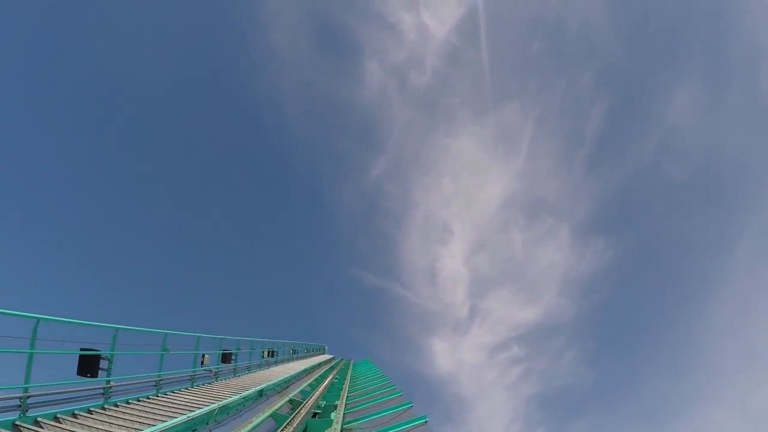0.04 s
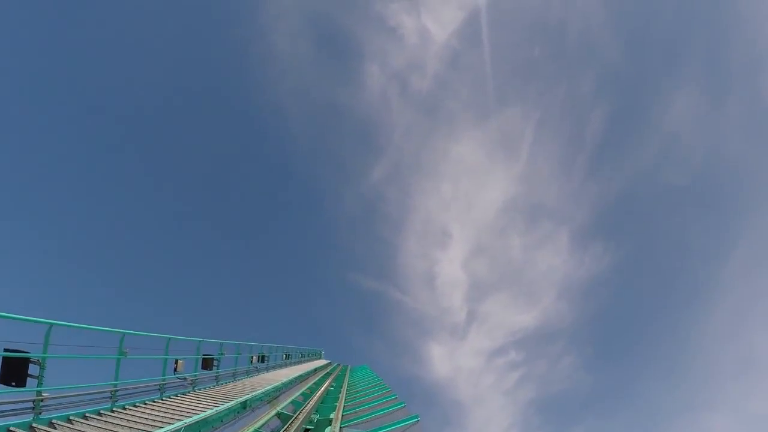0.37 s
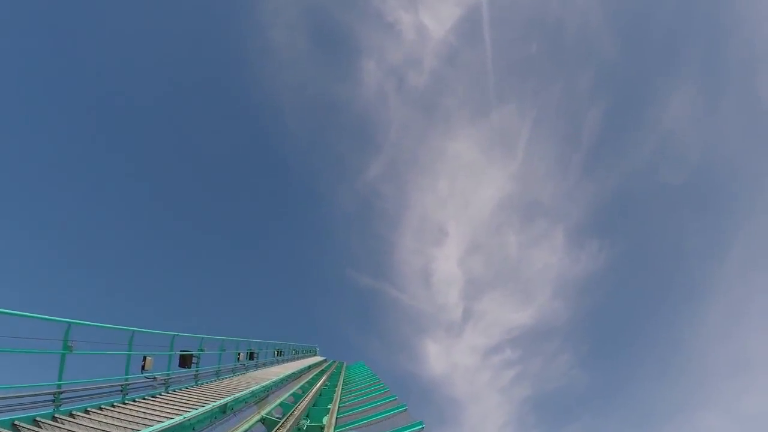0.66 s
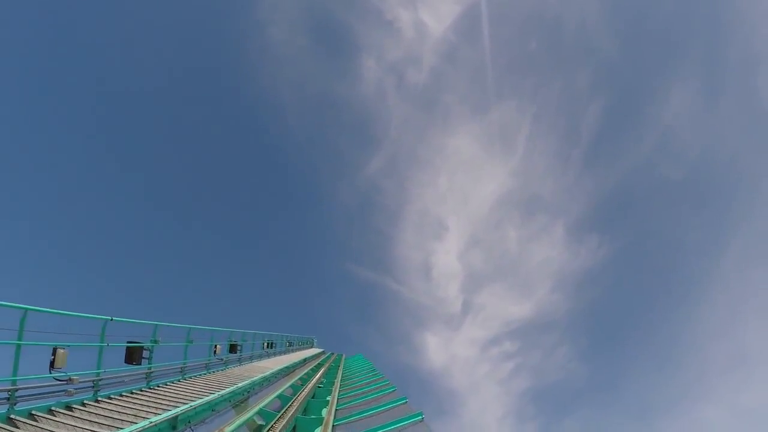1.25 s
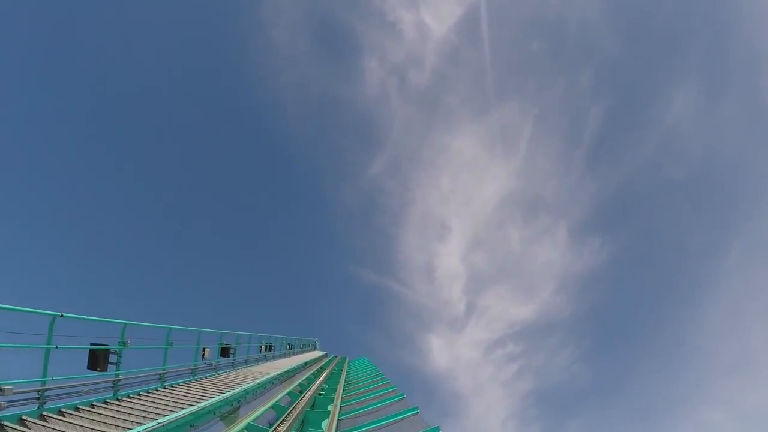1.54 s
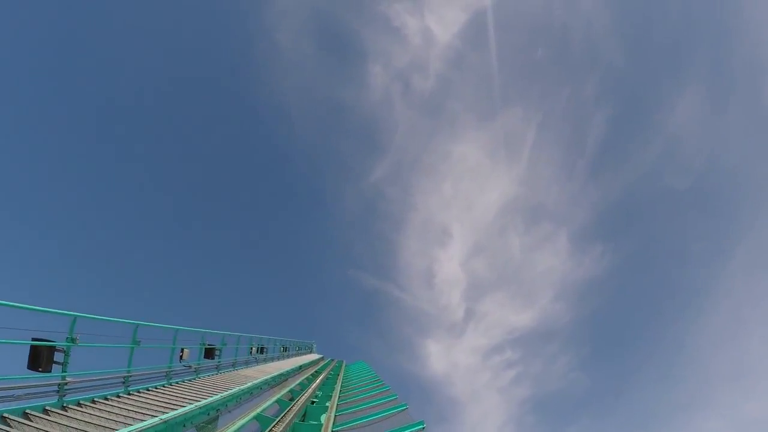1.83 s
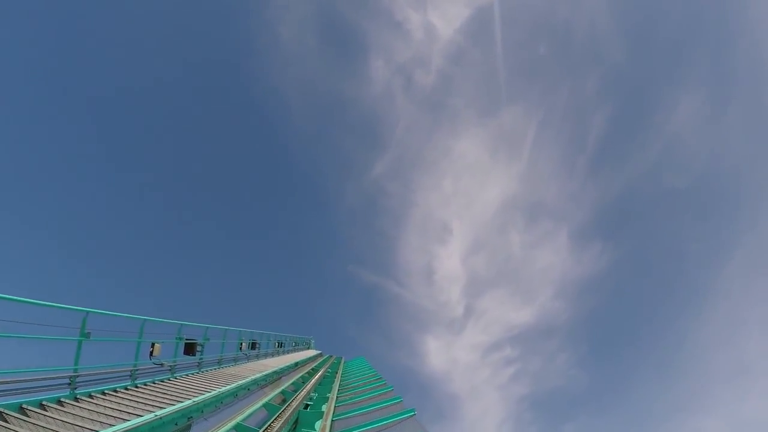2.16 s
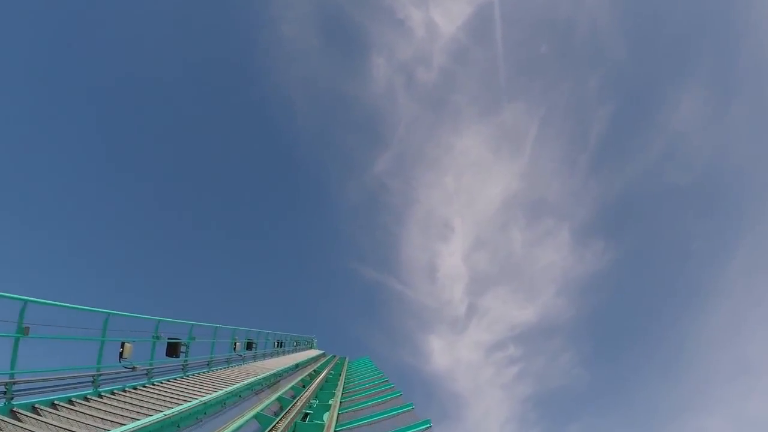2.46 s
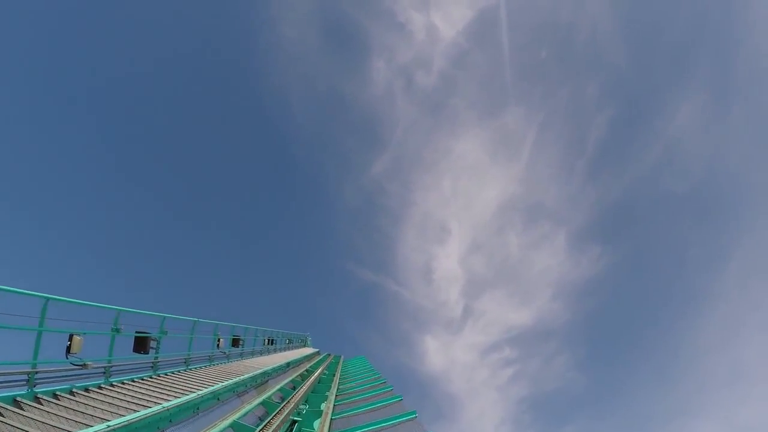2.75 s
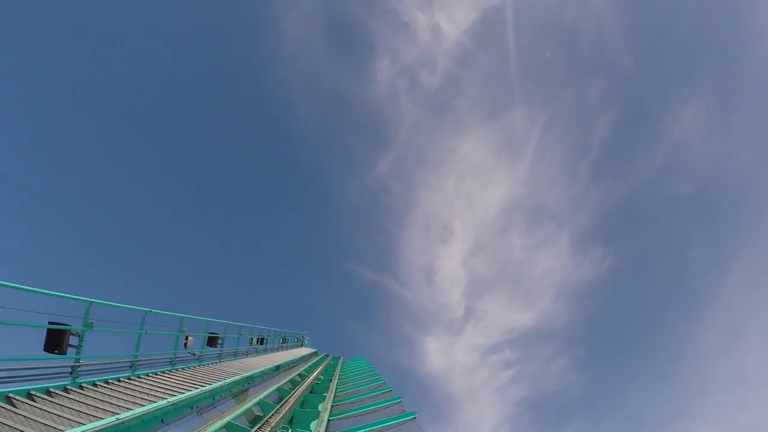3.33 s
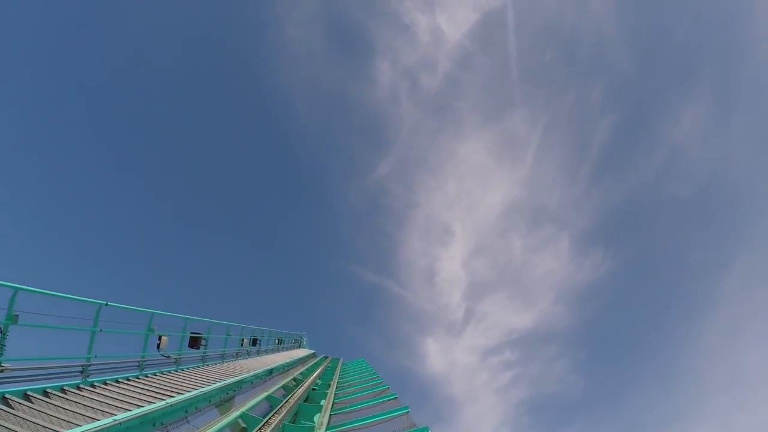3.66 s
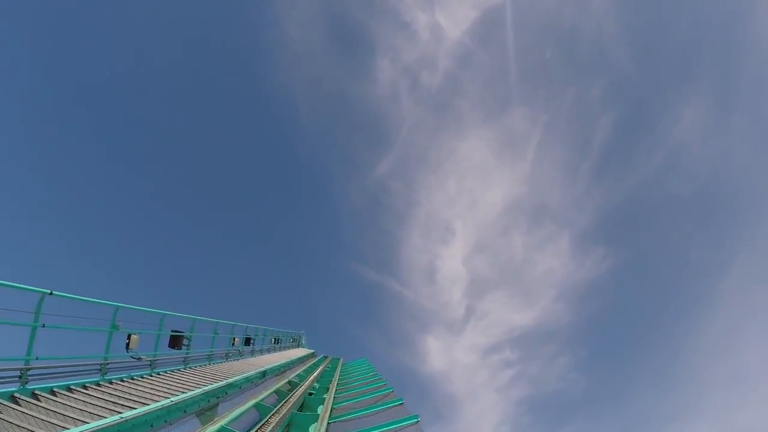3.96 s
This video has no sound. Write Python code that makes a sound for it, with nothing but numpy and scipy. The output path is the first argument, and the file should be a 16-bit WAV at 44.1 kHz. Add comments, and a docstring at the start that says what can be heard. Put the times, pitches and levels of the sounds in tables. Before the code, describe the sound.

Low rumble of a climbing roller coaster, with wind on the microphone and sharp steel clacks.

```python
"""A roller coaster train is hauled up its lift hill, heard from an open seat.
From the start wind flutters on the microphone, the car rumbles and drones, the lift chain rushes below.
From 0.4 s loose fittings rattle and knock and the track jolts the car; a hard clack comes at 0.7 s.
Light steel ticks follow, and two faint scrapes of the running gear at 2.5 and 2.9 s.
At 3.8 s steel snaps on steel and rings, then a double clunk."""
import sys
import numpy as np
from scipy import signal
from scipy.fft import rfft, irfft, next_fast_len
from scipy.io import wavfile
from scipy.ndimage import uniform_filter1d, map_coordinates

SR = 44100
rng = np.random.default_rng(int(sys.argv[2]) if len(sys.argv) > 2 else 0)


def put_to_file(sound):
    """Save the sound as 16-bit audio at rate SR, in the file named by the first command-line argument."""
    columns = np.atleast_2d(sound).T  # one column per channel
    safe = np.clip(columns, -1, 1)
    whole_steps = np.round(safe * 32767)
    wavfile.write(sys.argv[1], SR, whole_steps.astype(np.int16))


N = 176400

# Level curves, before layer gain: time_s, level_db
WIND_LEVEL = [(0, -15), (1, -17), (2.6, -16), (2.85, -11.5), (3.19, -24.5), (3.37, -14.5), (3.8, -18),
              (3.96, -13)]
RUMBLE_LEVEL = [(0, -18.5), (.9, -18), (1.25, -17), (1.95, -19.5), (2.24, -17), (2.55, -20), (2.9, -23),
                (3.16, -27.5), (3.27, -19), (4, -22)]
DRONE_LEVEL = [(0, -31), (.6, -26), (1.3, -28), (1.8, -33), (2.2, -28), (2.75, -29.5), (3.08, -41),
               (3.25, -32), (3.7, -29), (4, -29)]
CHAIN_LEVEL = [(0, -46.5), (.5, -45.5), (2.1, -47), (2.75, -49), (3.1, -51.5), (3.55, -49), (4, -45)]

# Source spectra: freq_hz, relative_db
WIND_SPECTRUM = [(8, -16), (18, -7), (25, 7.5), (33, 6), (45, -0.5), (70, -15), (200, -82.5)]
RUMBLE_SPECTRUM = [(30, -15), (50, -11.5), (68, -3), (85, 1), (108, -3.5), (130, -12.5), (160, -16),
                   (300, -32), (700, -85.5)]
DRONE_SPECTRUM = [(120, -33), (165, -10.5), (193, 2), (224, -1), (243, -8.5), (265, -7), (285, -14),
                  (360, -28), (500, -32.5), (1000, -83.5)]
CHAIN_SPECTRUM = [(400, 7), (700, 0.5), (1150, 1.5), (1550, -10), (1900, -3.5), (2550, -20.5),
                  (3800, -20.5), (7200, -30), (12500, -42), (16000, -62.5)]
RATTLE_SPECTRUM = [(250, 5.5), (1200, 6), (1900, 4), (2600, -10), (3400, -3.5), (4300, -19.5),
                   (5500, -13.5), (7200, -23.5), (8500, -31.5), (15000, -39.5)]
KNOCK_SPECTRUM = [(100, -2), (280, 12.5), (480, 5), (750, -0.5), (1200, 1.5), (1650, -17), (3500, -27.5),
                  (12000, -52.5)]
JOLT_SPECTRUM = [(15, -18.5), (30, -3.5), (85, 9.5), (115, 5), (160, -12), (210, -10), (300, -25),
                 (600, -79.5)]
CLACK_SPECTRUM = [(300, -4.5), (750, -1), (1250, 5), (1600, -1.5), (2200, 2), (2800, -13), (3700, -15.5),
                  (4500, -30.5), (6000, -28.5), (11000, -56)]
TICK_SPECTRUM = [(2000, -19), (3460, 2), (4230, -6.5), (4810, 1), (5600, -13.5), (7150, -10.5),
                 (16000, -35.5)]
SCRAPE_SPECTRUM = [(2000, -16.5), (5000, -0.5), (12000, -6), (16000, -13.5)]
SNAP_SPECTRUM = [(300, -17.5), (1300, -12), (2050, -5), (2900, 0), (3700, -1.5), (4200, -11), (4750, -5),
                 (5600, -14.5), (6700, -6.5), (8500, -15.5), (11500, -17), (12700, -29.5), (16000, -27.5)]

# Chain clatters: centre_s, level_db
CLATTERS = [(.205, -39.5), (.59, -48.5), (.9, -51.5), (1.143, -41.5), (1.375, -46), (1.61, -46),
            (3.52, -44)]
# Loose-metal rattles, before layer gain: centre_s, length_s, chatter_db, buzz_db
RATTLES = [(0.414, 0.013, -35.5, -40), (0.511, 0.0088, -43.5, -40.5), (.646, 0.0064, -49.5, -44.5),
           (0.965, 0.012, -45, -60), (1.759, 0.012, -37, -46.5), (1.841, 0.012, -41.5, -52),
           (1.882, 0.016, -32.5, -41), (1.917, 0.009, -40, -41), (2.0, 0.013, -40, -56),
           (2.098, 0.012, -50, -49), (2.161, 0.0074, -44, -50), (2.247, 0.022, -42.5, -54),
           (2.345, .008, -51, -46), (2.45, 0.0098, -35, -33.5), (2.485, 0.02, -43.5, -50),
           (2.839, 0.02, -43.5, -47), (2.955, 0.02, -34.5, -46), (3.029, .009, -54, -51),
           (3.225, 0.0092, -42.5, -48), (3.326, 0.0099, -41.5, -43.5), (3.419, 0.01, -43, -42),
           (3.693, .008, -43.5, -51), (3.9, 0.0035, -38, -28)]
# Fitting knocks and car jolts, before layer gain: start_s, level_db
KNOCKS = [(.512, -27.5), (.833, -30), (1.733, -25.5), (1.755, -29.5), (1.857, -27.5), (2.192, -29),
          (2.324, -29.5), (2.44, -28), (2.564, -22.5), (2.631, -31.5), (2.815, -30.5), (3.106, -31),
          (3.1405, -30), (3.219, -27.5), (3.277, -26.5), (3.32, -26.5), (3.417, -27.5), (3.696, -32.5),
          (3.811, -24.5), (3.898, -18.5), (3.911, -16)]
JOLTS = [(.566, -3), (.694, -4.5), (1.103, -7.5), (1.22, -3), (1.345, -7), (1.612, -11), (1.733, -5),
         (2.06, -6.5), (2.215, -4.5), (2.337, -8.5), (2.808, -10.5), (2.932, -4.5), (3.607, -7.5),
         (3.9, -7.5)]
# Clack contacts and steel ticks: start_s, level_db
CLACKS = [(.7063, -13.5), (.7075, -8.5), (.7104, -10), (.719, -28), (3.898, -20), (3.9112, -29)]
TICKS = [(1.068, -38), (2.788, -23), (3.48, -32.5)]
# Running-gear scrapes: centre_s, length_s, level_db
SCRAPES = [(2.493, 0.03, -63), (2.86, 0.04, -61.5)]
# Steel modes: pitch_hz
STEEL_HZ = [3074, 3354, 4183, 4312, 4500, 4834, 5394, 5464, 6105, 6778, 6982]
# Strength and decay of those modes: relative_db, t60_s
STEEL_DECAYS = [(-18.5, .3), (-14.5, .2), (-21.5, .35), (-10.5, 0.247), (-6, 0.2), (4.5, 0.1), (-5.5, 0.12),
                (-10.5, .27), (-23, 0.18), (-9, .1), (-18.5, 0.36)]


def amp(db):
    """Decibels to gain."""
    return 10 ** (np.asarray(db) / 20)


def unit(x):
    """Scale to rms 1."""
    return x / np.sqrt(np.mean(x ** 2) + 1e-20)


def curve(rows):
    """Per-sample values from (time_s, value) rows."""
    return np.interp(np.arange(N) / SR, *np.transpose(rows))


def wobble(rate_hz):
    """Smooth random curve with knots at rate_hz."""
    return map_coordinates(rng.standard_normal(4000), [np.arange(N) * rate_hz / SR], mode="wrap")


def swell(centre_s, length_s):
    """Smooth rise and fall, peak 1."""
    return 1 / np.cosh(np.clip(2.8 * (np.arange(N) / SR - centre_s) / length_s, -20, 20))


def colour(x, spectrum):
    """Minimum-phase filter; keeps the power of white noise."""
    size = 2 * next_fast_len(len(x) // 2 + 8192)
    hz, db = np.transpose(spectrum)
    bins_hz = np.fft.rfftfreq(size, 1 / SR)
    gain = unit(amp(np.interp(np.log(bins_hz + 1), np.log(hz), db)))
    cepstrum = irfft(np.log(gain))
    cepstrum[1:size // 2] *= 2
    cepstrum[size // 2 + 1:] = 0
    return irfft(rfft(x, size) * np.exp(rfft(cepstrum)))[:len(x)]


def noise(spectrum):
    """Coloured noise, rms 1."""
    return unit(colour(rng.standard_normal(N + SR // 2), spectrum)[-N:])


def even(x, span_s):
    """Even out swells longer than span_s; rms 1."""
    window = signal.windows.hann(int(span_s * SR) + 3)
    power = np.abs(signal.fftconvolve(x ** 2, window / window.sum(), "same"))
    return unit(x / np.sqrt(power + 0.099))


def add(track, start_s, sound):
    """Mix a sound into the track."""
    part = track[round(start_s * SR):][:len(sound)]
    part += sound[:len(part)]


def blows(rows, spectrum, t60_s, scatter):
    """Impacts: a push plus scattered reflections that ripple the spectrum but keep its broad shape."""
    track, t, lead_samples = np.zeros(N), np.arange(SR // 5) / SR, 128
    impulse_peak = np.abs(colour(1. * (t == 0), spectrum)).max()
    for start_s, db in rows:
        force = rng.standard_normal(len(t)) * amp(-60 * t / t60_s)
        force *= scatter / np.linalg.norm(force)
        force[0] += 1
        ripple = rfft(np.roll(force, lead_samples))
        broad_power = uniform_filter1d(uniform_filter1d(np.abs(ripple) ** 2, size=140), size=140)
        blow = colour(irfft(ripple / np.sqrt(broad_power)), spectrum)
        add(track, start_s - lead_samples / SR, amp(db) * blow / impulse_peak)
    return track


def wind():
    """Air flutters on the microphone."""
    return amp(curve(WIND_LEVEL)) * even(noise(WIND_SPECTRUM), span_s=.19)


def car_rumble(links_db, gain_db=-1):
    """The car rumbles on the track."""
    return amp(curve(RUMBLE_LEVEL) + gain_db + links_db) * even(noise(RUMBLE_SPECTRUM), span_s=.12)


def shell_drone(links_db, gain_db=-.5, depth_db=2.5, crest_s=.53, period_s=.5375):
    """The car's shell drones in regular surges."""
    surge_db = depth_db * np.cos(2 * np.pi * (np.arange(N) / SR - crest_s) / period_s)
    level_db = curve(DRONE_LEVEL) + gain_db + surge_db + links_db
    return amp(level_db) * even(noise(DRONE_SPECTRUM), span_s=.16)


def chain_rush(links_db, gain_db=1):
    """The lift chain rushes, clattering now and then."""
    rush = amp(curve(CHAIN_LEVEL) + gain_db + links_db / 2 + wobble(rate_hz=41))
    clatter = sum(amp(db) * swell(centre_s, length_s=.019) for centre_s, db in CLATTERS)
    return (rush + clatter) * noise(CHAIN_SPECTRUM)


def chain_rollers(gain_db=-13.5, ticks_per_s=35):
    """The rollers tick dryly at random."""
    impulses = rng.standard_normal(N) * (rng.random(N) < ticks_per_s / SR)
    return amp(curve(CHAIN_LEVEL) + gain_db) * unit(colour(impulses, RATTLE_SPECTRUM))


def rattles(chatter_gain_db=-.5, buzz_gain_db=-9.5, buzz_hz=3430, half_width_hz=170):
    """Loose metal: flurries of tiny contacts and a narrow buzzing resonance."""
    chatter_env = sum(amp(db) * swell(centre_s, length_s) for centre_s, length_s, db, _ in RATTLES)
    buzz_env = sum(amp(db) * swell(centre_s, length_s) for centre_s, length_s, _, db in RATTLES)
    contacts = rng.standard_normal(N) * amp(2.1 * wobble(rate_hz=250) + 4.3 * rng.standard_normal(N))
    chatter = unit(colour(contacts, RATTLE_SPECTRUM))
    resonance = 1 / (1 + ((np.fft.rfftfreq(N, 1 / SR) - buzz_hz) / half_width_hz) ** 2)
    buzz = even(irfft(rfft(rng.standard_normal(N)) * resonance, N), span_s=.02)
    return amp(chatter_gain_db) * chatter_env * chatter + amp(buzz_gain_db) * buzz_env * buzz


def knocks(gain_db=4):
    """Loose fittings knock dully."""
    return amp(gain_db) * blows(KNOCKS, KNOCK_SPECTRUM, t60_s=.02, scatter=.75)


def jolts(gain_db=.5):
    """The track jolts the car with low thuds."""
    return amp(gain_db) * blows(JOLTS, JOLT_SPECTRUM, t60_s=.051, scatter=.5)


def clacks():
    """Hard contacts, milliseconds apart, stutter into clacks."""
    return blows(CLACKS, CLACK_SPECTRUM, t60_s=.014, scatter=1.6)


def steel_modes(t):
    """Struck steel: one decaying sine per mode."""
    return [amp(db - 60 * t / t60_s) * np.sin(2 * np.pi * hz * t)
            for hz, (db, t60_s) in zip(STEEL_HZ, STEEL_DECAYS)]


def steel_ticks(ring_gain_db=-34):
    """Light taps stir only the steel's strongest mode."""
    ring = max(steel_modes(np.arange(SR // 2) / SR), key=np.max)
    track = blows(TICKS, TICK_SPECTRUM, t60_s=.008, scatter=1)
    for start_s, db in TICKS:
        add(track, start_s, amp(db + ring_gain_db) * ring)
    return track


def gear_scrapes():
    """The running gear scrapes, thin and high."""
    envelope = sum(amp(db) * swell(centre_s, length_s) for centre_s, length_s, db in SCRAPES)
    return envelope * noise(SCRAPE_SPECTRUM)


def steel_snap(start_s=3.7851, crack_db=7.4, ring_gain_db=-34, clang_db=-43.5, clang_t60_s=.16):
    """Steel strikes steel hard: a crack, all modes ringing, a noisy clang of many weak ones."""
    t = np.arange(SR // 2) / SR
    track = blows([(start_s, crack_db)], SNAP_SPECTRUM, t60_s=.009, scatter=1.5)
    ring = amp(ring_gain_db) * sum(steel_modes(t))
    clang = amp(clang_db - 60 * t / clang_t60_s) * noise(TICK_SPECTRUM)[:len(t)]
    add(track, start_s, ring + clang)
    return track


def scene(link_hz=7.7, link_depth_db=1.56):
    """Close mono mix; passing chain links pulse the running noise unevenly."""
    link_phase_rad = 2 * np.pi * link_hz * np.arange(N) / SR + 2.7 * wobble(rate_hz=3.5)
    links_db = link_depth_db * np.sin(link_phase_rad)
    running = wind() + car_rumble(links_db) + shell_drone(links_db) + chain_rush(links_db)
    running += chain_rollers()
    events = rattles() + knocks() + jolts() + clacks() + steel_ticks() + gear_scrapes() + steel_snap()
    return (running + events)[None]


def record(dry, ceiling=.9, cutoff_hz=16000):
    """Soft peak limit, then low-pass."""
    limited = dry / (1 + np.abs(dry / ceiling) ** 6) ** (1 / 6)
    return signal.sosfiltfilt(signal.butter(10, cutoff_hz, fs=SR, output="sos"), limited)


dry = scene()
out = record(dry)
put_to_file(out)
```